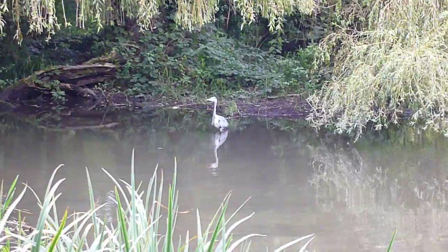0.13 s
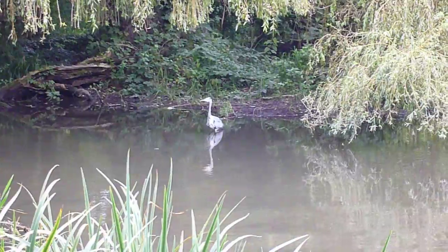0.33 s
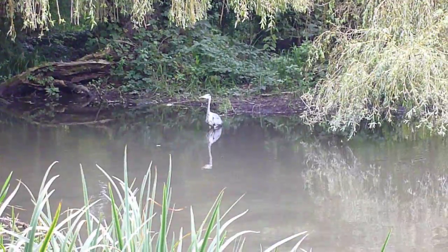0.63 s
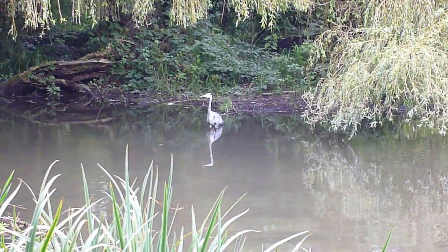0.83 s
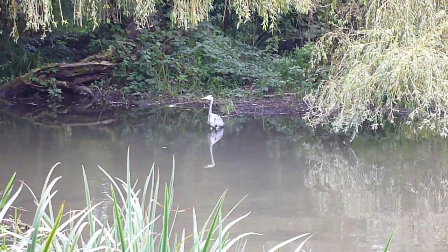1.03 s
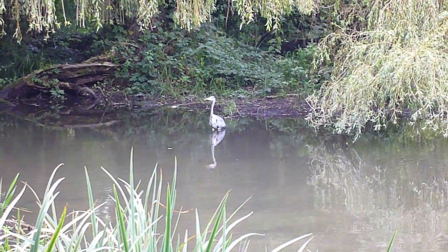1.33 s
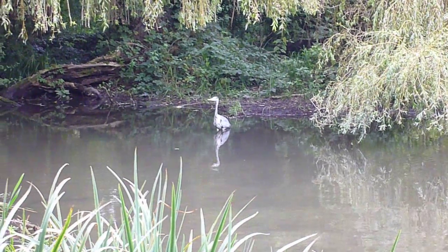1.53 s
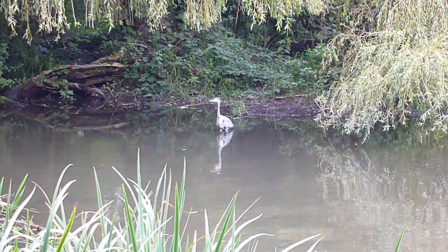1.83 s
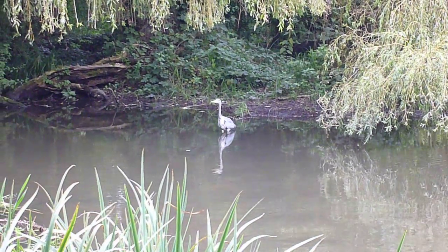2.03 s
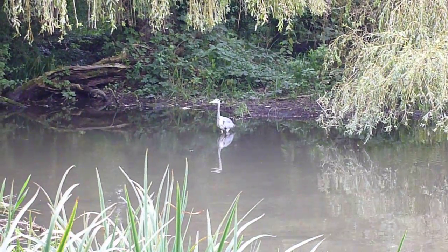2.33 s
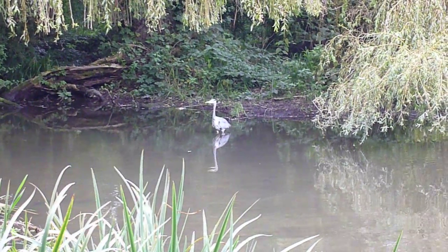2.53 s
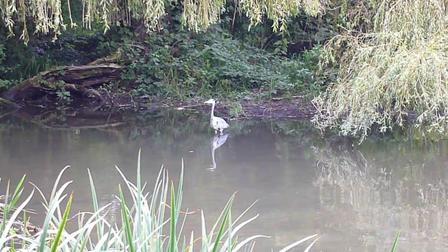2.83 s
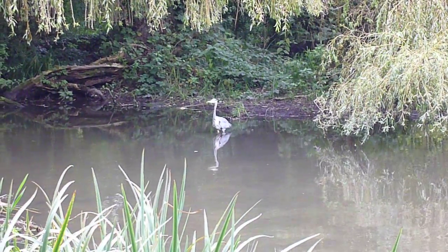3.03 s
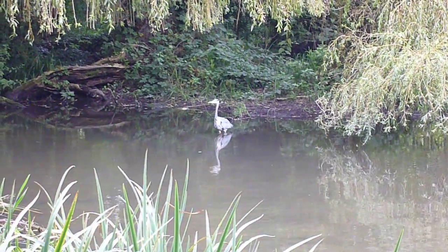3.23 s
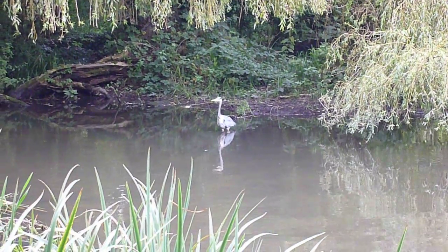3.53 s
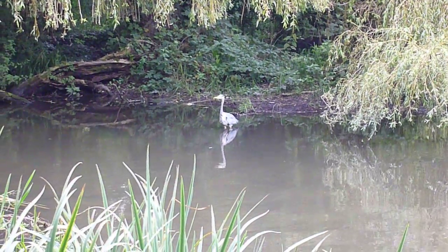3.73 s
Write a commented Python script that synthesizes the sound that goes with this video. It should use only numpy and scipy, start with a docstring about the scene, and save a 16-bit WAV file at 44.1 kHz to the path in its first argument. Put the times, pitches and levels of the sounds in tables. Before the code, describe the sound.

A dog barks some way off, with short, high, slightly raspy yaps at about 0.1, 0.4, 1.1 and 1.6 seconds. After a pause it barks again at 3.3 and 3.8 seconds. Each bark echoes off the far bank and rings briefly among the trees. A steady, low hush of leaves and distant rumble runs underneath. Two faint, dull bumps sound near the microphone around 2.7 and 2.9 seconds.

```python
"""A wooded pond: a dog yaps some way off, over a steady low hush of leaves and far rumble.
In each bark the vocal folds open on a low note, break roughly up into an arched yelp with a rasp
of air, then close on a fading note. The far bank throws the barks back and the trees ring on.
Two soft, dull bumps sound near the microphone."""
import sys
import numpy as np
from scipy import signal
from scipy.fft import rfft, irfft, next_fast_len
from scipy.io import wavfile
from scipy.ndimage import uniform_filter1d

SR = 44100
rng = np.random.default_rng(int(sys.argv[2]) if len(sys.argv) > 2 else 0)


def unload_wav(signal):
    """Save mono or channel-first audio to the path in sys.argv[1] as 16-bit WAV at rate SR, clipped to [-1, 1]."""
    wavfile.write(
        sys.argv[1],
        SR,
        np.round(np.clip(np.atleast_2d(signal).T, -1, 1) * 32767).astype(np.int16),
    )


N = 171549


def amp(db):
    return 10 ** (np.asarray(db) / 20)


def unit(x):
    """Scale to rms 1."""
    return x / np.sqrt(np.mean(x ** 2) + 1e-20)


def read(points, hz):
    """Interpolate a table on a log-frequency axis."""
    f, value = np.transpose(points)
    return np.interp(np.log(hz + 1), np.log(f + 1), value)


def colour(x, points):
    """Filter by a table of (frequency [Hz], gain [dB])."""
    size = next_fast_len(len(x) + 4096)
    gain = amp(read(points, np.fft.rfftfreq(size, 1 / SR)))
    return irfft(rfft(x, size) * gain, size)[:len(x)]


def wander(size, hz):
    """Random motion low-passed at hz, rms 1."""
    f = np.fft.rfftfreq(size, 1 / SR)
    return unit(irfft(rfft(rng.standard_normal(size)) * np.exp(-(f / hz) ** 2) * (f > 0), size))


def add(mix, start_s, sound):
    at = round(start_s * SR)
    part = mix[at:at + len(sound)]
    part += sound[:len(part)]


def hush(level_db=-40.5, patchy_db=1.08, rumble_top_hz=510):
    """Leaf hiss with faint drifting patches, over a far rumble that slowly swells."""
    # Leaf and rumble spectrum (frequency [Hz], relative density [dB])
    spectrum = [(26, -43.5), (45, -21.5), (86, -13), (147, -2.5), (285, -3.5), (428, -6.5), (477, -10),
                (554, -6), (604, -6), (717, -7.5), (765, -3.5), (1230, -9), (1520, -9.5), (1920, -16),
                (2390, -16.5), (5870, -30.5), (7600, -32.5), (9880, -62), (16700, -120)]
    # Rumble swell (time [s], gain [dB])
    rumble = [(0, -1), (.7, 3), (1.2, 1), (2.1, 2), (2.7, 4.5), (3.0, 1), (3.25, 4.5), (3.55, -1),
              (3.89, 0)]
    hz, t, noise = signal.stft(rng.standard_normal(N), SR, nperseg=1024)
    patches = uniform_filter1d(rng.standard_normal(noise.shape), size=8, axis=0)
    patches = unit(uniform_filter1d(patches, size=10, axis=1))
    swell_db = np.outer(np.exp(-(hz / rumble_top_hz) ** 4), np.interp(t, *np.transpose(rumble)))
    air = signal.istft(noise * amp(patchy_db * patches + swell_db))[1][:N]
    return amp(level_db) * unit(colour(air, spectrum))


def bumps():
    """Soft, dull bumps near the microphone: short swells of low noise."""
    # Bumps (start [s], length [s], level at crest [dB])
    events = [(2.63, 0.1, -48), (2.853, 0.059, -44.5)]
    # Bump spectrum (frequency [Hz], relative level [dB])
    spectrum = [(25, -15), (55, -5), (110, 0), (220, -10), (500, -38), (2000, -70)]
    out = np.zeros(N)
    for start_s, length_s, level_db in events:
        size = round(length_s * SR)
        thud = unit(colour(rng.standard_normal(size), spectrum))
        add(out, start_s, amp(level_db) * np.hanning(size) * thud)
    return out


def scatter(x, t60s, taps_per_s=3000):
    """Many small reflections of random sign, total energy 1; t60s is (frequency [Hz], T60 [s])."""
    taps = rng.choice([-1., 1.], SR) * (rng.random(SR) < taps_per_s / SR)
    hz, t, bands = signal.stft(taps, SR, nperseg=256)
    decay = amp(-60 * t / read(t60s, hz)[:, None])
    tail = signal.istft(bands * decay, SR, nperseg=256)[1]
    return signal.fftconvolve(x, tail / np.linalg.norm(tail))[:len(x)]


def rasp(size, bite_hz, bite_db, half_width_oct=0.093):
    """Air hissing through the open mouth, with a narrow treble band, the bite, raised or cut."""
    # Breath spectrum (frequency [Hz], relative level [dB])
    spectrum = [(400, -24.5), (680, 14), (1000, 20.5), (1330, 10.5), (1600, 2.5), (1950, 1), (2400, 10),
                (2900, -14), (3300, -17), (3800, -20), (4450, -29), (5400, -23), (6800, -21.5),
                (8000, -35.5)]
    air = unit(colour(rng.standard_normal(size), spectrum))
    ratio = 2 ** half_width_oct
    return colour(air, [(bite_hz / ratio, 0), (bite_hz, bite_db), (bite_hz * ratio, 0)])


def throat(source, gain_1800_db, gain_2400_db):
    """Throat resonances, with two upper bands set per bark."""
    # Throat response (frequency [Hz], gain [dB])
    response = [(300, -24), (600, -25.5), (780, -4), (950, -4), (1250, -4.5), (1500, -18.5), (1800, -24.5),
                (2050, -21.5), (2330, -12), (2750, -30), (3300, -26.5), (3700, -51.5), (4400, -31),
                (5400, -46), (6800, -35), (8000, -41)]
    upper_bands = [(1400, 0.016), (1800, gain_1800_db), (2400, gain_2400_db), (3000, 0.032)]
    return colour(colour(source, response), upper_bands)


def vocal_folds(pitch_hz, rough, harsh, broken, closed, jitter_hz=260, slope_db_per_oct=-5):
    """Ten harmonics, roughened by pitch jitter, alternating strong and weak pulses, and flutter."""
    jitter = (.016 * (1 + closed) + .12 * harsh) * wander(len(pitch_hz), jitter_hz)
    phase = 2 * np.pi * np.cumsum(pitch_hz * (1 + jitter)) / SR
    pulses = sum(amp(slope_db_per_oct * np.log2(k)) * np.cos(k * phase) for k in range(1, 11))
    alternation = 1 + (1.1 * harsh * broken + .4 * closed) * np.cos(phase / 2)
    flutter = 1 + .8 * (harsh + rough * closed) * wander(len(pitch_hz), jitter_hz / 2)
    return pulses * alternation * flutter


def bark(opening_s, yelp_s, closing_s, low_hz, top_hz, end_hz, opening_db, yelp_db, closing_db,
         rough, gain_1800_db, gain_2400_db, rasp_db, bite_hz, bite_db):
    """The folds jump from a low note to an arched yelp, then close; air rasps at the break."""
    attack_s, release_s, break_s, close_s = .022, .01, .008, .011
    opening_rise, arch_drop = 0.1724, 0.1494  # shares of pitch
    arch_peak = 0.686  # share of the yelp's length
    length_s = opening_s + yelp_s + closing_s
    t = np.arange(0, length_s, 1 / SR)
    broken = .5 + .5 * np.tanh(2 * (t - opening_s) / break_s)
    closed = .5 + .5 * np.tanh(2 * (t - opening_s - yelp_s) / close_s)

    def stages(opening, yelp, closing):
        return (opening * (1 - broken) + yelp * broken) * (1 - closed) + closing * closed

    def after_break(lag_s, width_s):
        return np.exp(-((t - opening_s - lag_s) / width_s) ** 2)

    opening_hz = low_hz * (1 + opening_rise * (t / opening_s - .6))
    yelp_progress = np.clip((t - opening_s) / yelp_s, 0, 1)
    yelp_hz = top_hz * (1 - arch_drop * (yelp_progress / arch_peak - 1) ** 2)
    harsh = rough * np.maximum(after_break(lag_s=0.01446, width_s=0.024), .3 * (1 - broken))
    folds = vocal_folds(stages(opening_hz, yelp_hz, end_hz), rough, harsh, broken, closed)

    falter_db = -6.5 * after_break(lag_s=0, width_s=0.006)
    sag_db = -2.5 * after_break(lag_s=yelp_s + 0.26 * closing_s, width_s=0.25 * closing_s)
    level = amp(stages(opening_db, yelp_db, closing_db) + falter_db + sag_db)
    voice = throat(level * folds, gain_1800_db, gain_2400_db)

    airflow = after_break(lag_s=.011, width_s=.021) + .22 * stages(rough, 0.8, 0)
    air = amp(yelp_db + rasp_db) * airflow * rasp(len(t), bite_hz, bite_db)
    attack = np.sin(np.pi / 2 * np.minimum(t / attack_s, 1)) ** 2
    release = np.clip((length_s - t) / release_s, 0, 1)
    return attack * release * (voice + air)


def dog():
    """Barks arrive directly, off nearby ground and trunks, off the far bank and through the wood."""
    # Barks (start [s], opening [s], yelp [s], closing [s], opening pitch [Hz], top pitch [Hz],
    # closing pitch [Hz], opening gain [dB], yelp gain [dB], closing gain [dB], roughness [0-1],
    # throat gain at 1.8 kHz [dB], at 2.4 kHz [dB], rasp re yelp gain [dB], bite [Hz], bite gain [dB])
    barks = [ (-.19, .03, 0.084, .08, 621, 1001, 1020, -12, -11.5, -22.5, 0.8, -3, -2, -8.5, 3200, -4),
             (0.139, .028, .070, .085, 602.5, 903.2, 761, -7.5, -15, -19.5, 0.4, 5.5, -0.5, -18, 3090, 13),
             (.447, 0.037, 0.068, .092, 592.6, 891, 774, -15, -12, -22, 0.39, -2, -0.5, -22, 3000, 12.5),
             (1.086, 0.037, 0.071, 0.032, 633, 960.6, 931, -11.5, -12.5, -21, 0.27, -1.5, 1.5, -18, 3250, 13),
             (1.639, 0.034, 0.0686, 0.029, 679.6, 912, 902.5, -11.5, -7, -22, 0.33, 1, -2, -24.5, 4450, 19),
             (3.326, 0.027, 0.045, .038, 598.4, 885, 1050, -6.5, -13.5, -14, 0.63, -2, -11.5, -16.5, 3430, 3),
             (3.799, 0.039, 0.057, 0.037, 604, 924, 802, -16, -13, -10, 0.53, -1, -10, -14, 3900, 8), ]
    # Decay among the trees (frequency [Hz], T60 [s])
    wood_t60s = [(300, 2.2), (900, 1.35), (2000, 1.6), (4000, .6), (8000, 1.2)]
    near_db, bank_db, wood_db = -7, -18, -13
    near_t60_s, bank_t60_s, bank_delay_s = 0.087, 0.29, .1
    direct, near, bank = np.zeros((3, N + SR))  # 1 s lead-in
    for start_s, *shape in barks:
        sound = bark(*shape)
        add(direct, 1 + start_s, sound)
        # New near paths for each bark, as the head turns
        reflections = scatter(np.pad(sound, (0, SR // 2)), [(1, near_t60_s)])
        add(near, 1 + start_s, amp(near_db) * reflections)
    add(bank, bank_delay_s, amp(bank_db) * scatter(direct, [(1, bank_t60_s)]))
    wood = amp(wood_db) * scatter(direct, wood_t60s)
    return (direct + near + bank + wood)[SR:]


def scene():
    return (dog() + hush() + bumps())[None]


def record(dry):
    """Band limit and a small constant offset."""
    edge_hz, offset = 7900, -.0356
    lowpass = signal.firwin(101, edge_hz, window=("kaiser", 8), fs=SR)
    return offset + signal.lfilter(lowpass, 1, dry)


dry = scene()
out = record(dry)
unload_wav(out)
```